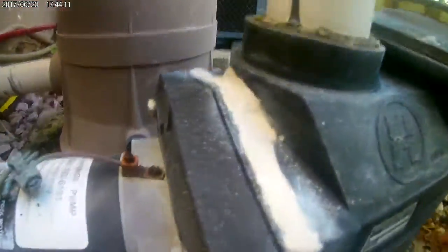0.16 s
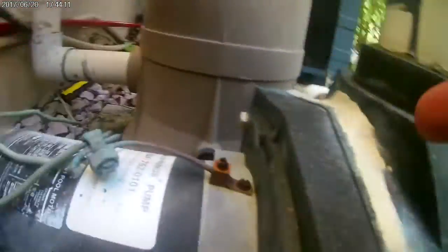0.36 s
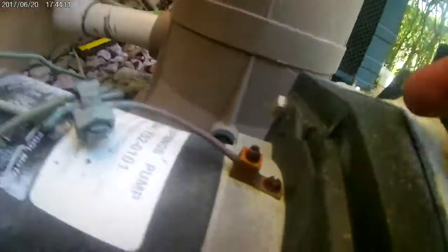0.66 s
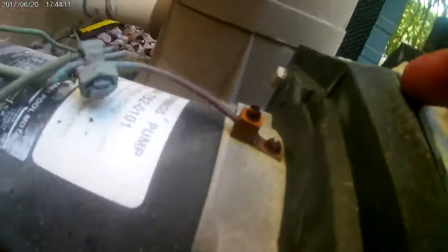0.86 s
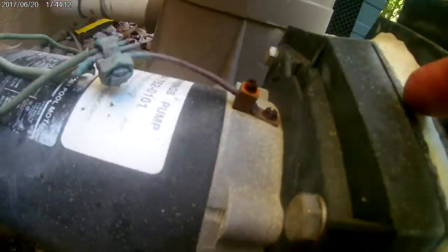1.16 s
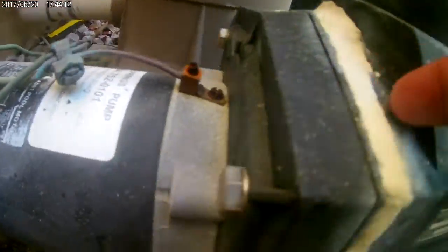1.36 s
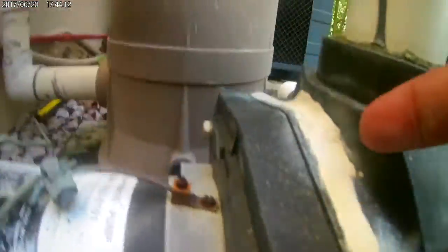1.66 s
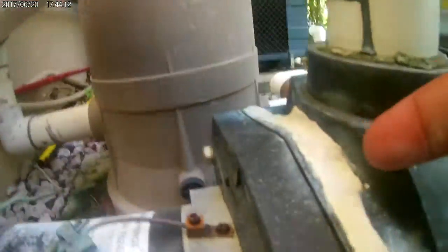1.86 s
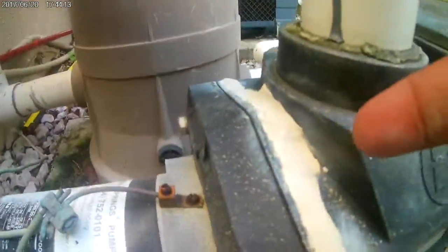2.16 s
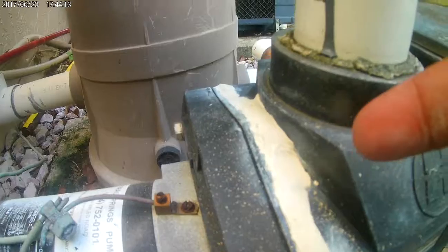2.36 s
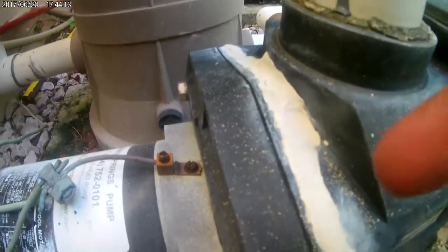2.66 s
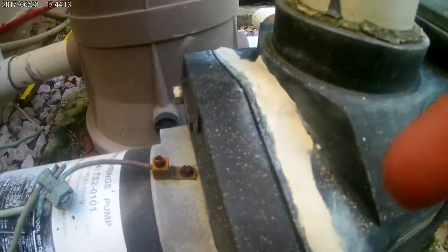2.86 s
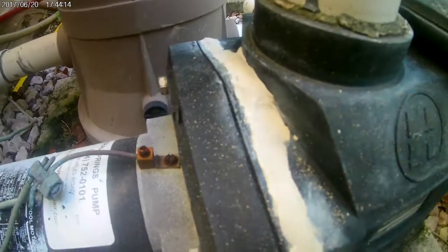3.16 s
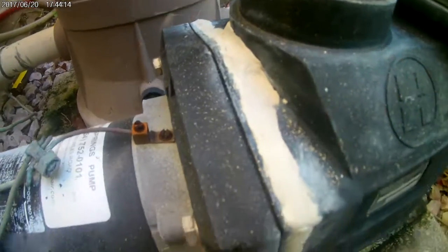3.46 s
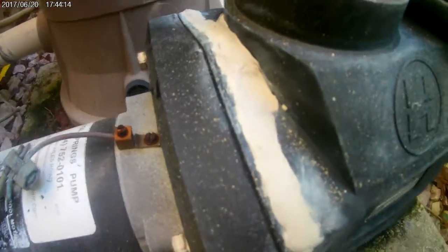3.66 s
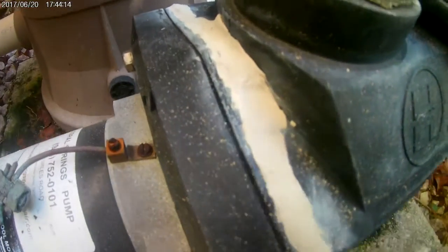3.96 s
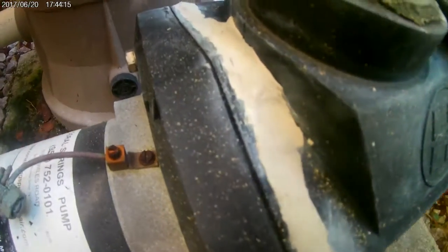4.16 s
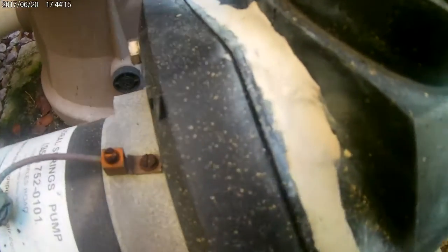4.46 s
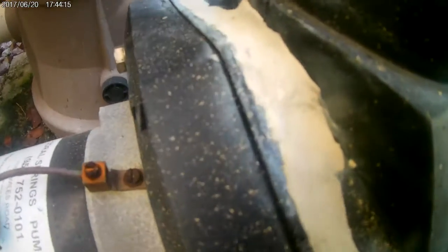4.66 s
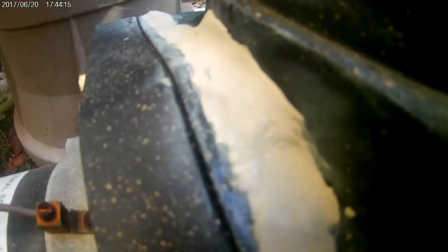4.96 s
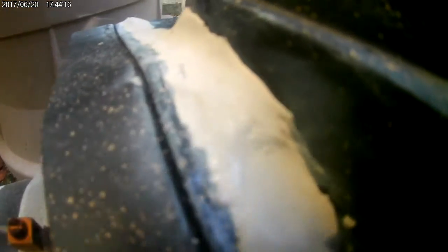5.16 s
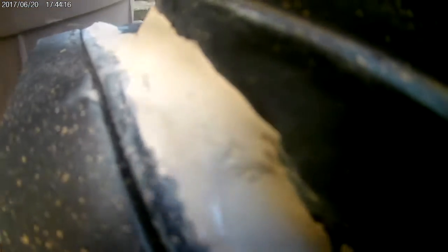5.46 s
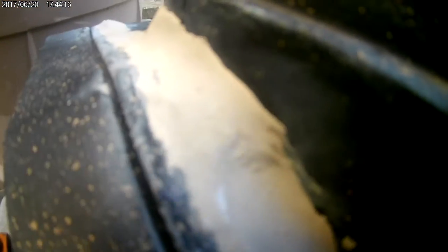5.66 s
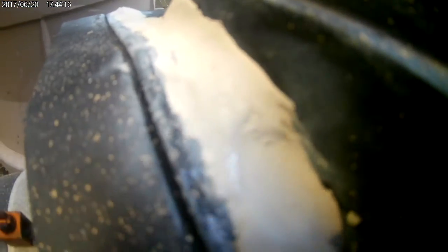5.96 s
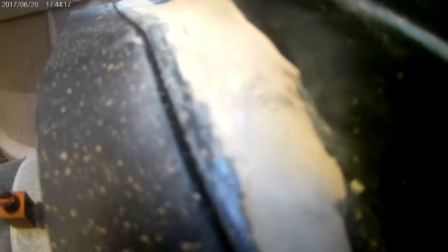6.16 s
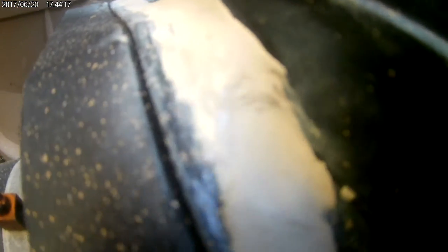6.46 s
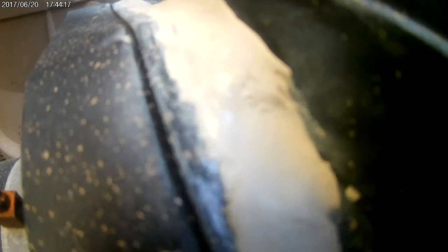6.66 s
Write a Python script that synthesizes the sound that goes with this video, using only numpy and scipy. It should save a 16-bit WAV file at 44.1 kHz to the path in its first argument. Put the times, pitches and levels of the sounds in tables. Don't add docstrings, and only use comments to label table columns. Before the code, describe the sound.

Heard very close through a small, rough hand-held microphone: steady pump whir, rushing water and fan air, faint high motor whine. Handling sits on top: sharp knocks at the start, soft finger bumps, skin rubbing, low rumble, and a lighter click midway. Low electrical hum comes and goes, becoming a strong buzzing drone near the end over faint hiss.

```python
import sys
import numpy as np
from scipy import signal
from scipy.fft import rfft, irfft
from scipy.io import wavfile
from scipy.ndimage import uniform_filter1d

SR = 44100
rng = np.random.default_rng(int(sys.argv[2]) if len(sys.argv) > 2 else 0)


def output_pcm(signal):
    pcm = np.clip(np.atleast_2d(signal).T, -1, 1) * 32767
    wavfile.write(sys.argv[1], SR, np.round(pcm).astype(np.int16))


def level_to_linear(level):
    exponent = np.asarray(level, float) / 20
    return 10 ** exponent


N = 299880
T = np.arange(N) / SR

MAINS_HZ = 120
SHAFT_HZ = 57.98


def unit(x):
    return x / np.sqrt(np.mean(x ** 2))


def columns(table):
    s, *rest = np.transpose(table)
    return [np.interp(T, s, c) for c in rest]


def noise():
    return rng.standard_normal(N)


def walk(rate_hz):
    hold = int(SR / rate_hz)
    steps = np.repeat(rng.standard_normal(N // hold + 1), hold)
    return unit(uniform_filter1d(uniform_filter1d(steps, hold), hold)[:N])


def band(x, lo_hz, hi_hz, order=2):
    sos = signal.butter(order, [lo_hz, min(hi_hz, SR / 2.1)], "bandpass", fs=SR, output="sos")
    return signal.sosfilt(sos, x)


def colour(x, slope, bells):
    hz = np.linspace(1, SR / 2, 4097)
    line_hz, line_db = np.transpose(slope)
    db = np.interp(np.log(hz), np.log(line_hz), line_db)
    db = db + sum(peak_db / (1 + (2 * (hz - f) / width) ** 2) for f, width, peak_db in bells)
    cepstrum = irfft(np.log(level_to_linear(db)))
    cepstrum[1:4096] *= 2
    cepstrum[4097:] = 0
    impulse = irfft(np.exp(rfft(cepstrum)))[:4096]
    return signal.fftconvolve(x, impulse)[:N]


def patchy(x, patchy_db, from_hz):
    hz, _, cells = signal.stft(x, SR, nperseg=1536)
    depth_db = patchy_db * hz[:, None] / (hz[:, None] + from_hz)
    gain = level_to_linear(depth_db * rng.standard_normal(cells.shape))
    gain = gain / np.sqrt(np.mean(gain ** 2, axis=1, keepdims=True))
    return signal.istft(cells * gain, SR, nperseg=1536)[1][:N]


def tone(hz, wobble_db, wander_hz):
    turns = np.cumsum(hz + wander_hz * walk(6)) / SR + rng.random()
    return np.sqrt(2) * np.sin(2 * np.pi * turns) * level_to_linear(wobble_db * walk(9))


def steady(x, hold_s):
    return unit(x / (uniform_filter1d(x ** 2, int(hold_s * SR)) + 1e-9) ** 0.48)


def add(out, start_s, x):
    i = int(start_s * SR)
    out[i:i + len(x)] += x[:N - i]


# time_s, nearness_db, facing_db (towards the impeller housing)
PATH = [(0.0, -1, -1.5), (0.6, 0, 0.5), (0.86, 2, 1), (1.0, 1.5, -4), (1.3, .5, 0.5), (1.65, 1, -10),
        (2.0, -.5, -4), (2.4, -.5, -4.5), (3.2, -1, -3), (3.8, -1, 0), (4.2, -.5, -0.5), (4.7, 0.5, 2),
        (5.55, 1.5, 6), (6.2, 1, 6), (6.55, 1.6, 5.5), (6.8, 0.2, 6.5)]
# multiple (of the shaft rate), level_db
SHAFT_TONES = [(10, -60), (20, -75), (25, -72.5), (30, -70), (38, -70)]
# pitch_hz, level_db
SLOT_TONES = [(3571, -70), (3691, -72), (3811, -73), (3930, -68), (4053, -68), (4174, -69), (4238, -73),
              (4294, -70), (4521, -79)]
# pitch_hz, level_db
WHISTLES = [(10503, -90), (13636, -97), (13717, -96)]


def pump():
    near_db, facing_db = columns(PATH)
    rush_db, hiss_db = 0.99 * near_db, 0.59 * near_db
    vanes = level_to_linear(-57 + 2.3 * near_db) * tone(6 * SHAFT_HZ, 2.0, 0.6)
    second_vanes = level_to_linear(-56 + facing_db) * tone(12 * SHAFT_HZ, 1.5, 0.7)
    orders = sum(level_to_linear(db) * tone(k * SHAFT_HZ, 2.5, 1.5) for k, db in SHAFT_TONES)
    orders = orders + level_to_linear(-63) * tone(10 * MAINS_HZ, 2.5, 6.0)
    slots = sum(level_to_linear(db) * tone(hz, 3.0, 3.5) for hz, db in SLOT_TONES + WHISTLES)
    lines = vanes + second_vanes + orders * level_to_linear(rush_db) + slots * level_to_linear(hiss_db)
    return lines + rush(-48 + rush_db, -56 + hiss_db)


# pitch_hz, level_db (per Hz)
RUSH = [(88, -28), (150, -14.5), (296, -2.5), (346, -24), (397, -3.5), (697, 1), (847, -0.5), (1180, -5),
        (1350, -3.5), (2780, -11), (4020, -11), (7940, -27), (15700, -51)]
# pitch_hz, width_hz, level_db
CASE = [(473, 188, 7.5), (1194.5, 114, 14), (1366, 53, -23.5), (1590, 270, 4), (1760, 110, -1),
        (1727, 96, 2.5), (2813, 210, -9), (3350, 330, 10.5), (4080, 220, 6), (4786, 240, 7),
        (5560, 710, -2.5), (6530, 1300, 7), (7950, 560, -40), (9400, 2100, 8.5)]


def rush(rush_db, hiss_db):
    flow = patchy(colour(noise(), RUSH, CASE), 5.1, 3000)
    edges_hz = 150 * 2 ** np.arange(0, 7.1, 0.5)
    throb = 1 + 0.11 * np.sin(2 * np.pi * MAINS_HZ * T)
    shared = walk(15)
    parts = [band(flow, lo, hi) * level_to_linear(0.4 * shared + 0.4 * walk(25))
             for lo, hi in zip(edges_hz, edges_hz[1:])]
    low = sum(parts[:8])
    high = throb * sum(parts[8:])
    low = low / band(low, 400, 2400).std()
    high = high / band(high, 3000, 7000).std()
    return level_to_linear(rush_db) * low + level_to_linear(hiss_db) * high


# start_s, length_s, level_db, rise_db (gain until the end)
PRESSES = [
    (0.0, 0.019, -34.5, -10),
    (0.865, 0.07, -47, 2),
    (1.077, 0.33, -43, 2),
    (3.72, 0.077, -63, 2),
    (4.55, .08, -55.5, -2),
    (5.364, 0.577, -38.5, 5.5),
    (6.045, 0.065, -43.5, -2.5),
    (6.27, 0.07, -49, 0),
]


def hum():
    edge_s, rattle_from_db, rattle_db = 0.03, -40, -41.5
    gain = level_to_linear(-57.5 + 1.9 * walk(12))
    for start_s, length_s, db, rise_db in PRESSES:
        inside_s = np.minimum(T - start_s, start_s + length_s - T)
        held = np.clip(inside_s / edge_s + 0.5, 0, 1)
        gain = gain + held ** 2 * level_to_linear(db + rise_db * np.clip((T - start_s) / length_s, 0, 1))
    hard = (gain / level_to_linear(rattle_from_db)) ** 7.0
    rattle = level_to_linear(rattle_db) * hard / (1 + hard)
    return gain * tone(MAINS_HZ, 0.7, 0.095) + rattle * tone(MAINS_HZ / 2, 1.9, 2.6)


# time_s, level_db
EFFORT = [(0.0, -27), (0.09, -34), (0.26, -25), (0.45, -29.5), (1.66, -29.5), (1.68, -33), (1.97, -29.5),
          (2.14, -38), (2.4, -33), (3.29, -35.5), (3.35, -30), (3.52, -33.5), (3.98, -35), (4.01, -34.5),
          (6.04, -33.5), (6.1, -38.5), (6.27, -39.5), (6.8, -35)]
EFFORT_SHARES = (1.0, 0.83, 0.34)
# peak_s, length_s, extra_db, quickness (0 sways, 1 shakes and kneads)
SHIFTS = [(.11, 0.035, 5, 0.66), (0.169, 0.024, 19, 1.0), (.24, 0.026, 16, 0.78), (.31, 0.068, 7.5, 0.09),
          (.8, 0.061, 2, 0.36), (.86, 0.046, -3, 0.22), (.95, 0.06, 10, .1), (1.0, 0.058, 9, 0.77),
          (1.21, 0.045, 3, 0.45), (1.4, 0.044, 5.5, 0.93), (1.6, 0.047, 12, 0.26), (1.9, 0.048, 9, .9),
          (2.05, 0.16, -6.5, 0.12), (2.45, 0.31, 0.5, .1), (2.65, 0.074, 8.5, .1), (2.97, .05, 2, .2),
          (3.35, 0.14, 11, 0.51), (3.45, 0.096, -5.5, .1), (3.49, 0.015, 2, .8), (3.86, 0.11, 7, 0.083),
          (4.39, 0.046, 2.5, .1), (4.45, 0.044, 6.5, 1), (4.75, 0.15, 17, 0.45), (5.0, 0.054, 0, .1),
          (5.21, 0.11, 11, 0.33), (5.64, .06, 3.5, .8), (5.93, .05, 7, 0.3), (6.3, .06, 13, 0.16),
          (6.42, .04, 15, 0.17)]


def hand():
    effort_db = columns(EFFORT)[0] + 33
    slow_db, quick_db = 0, 0
    for peak_s, length_s, extra_db, quickness in SHIFTS:
        swell_db = extra_db * np.exp(-(2 * (T - peak_s) / length_s) ** 2)
        slow_db = slow_db + swell_db * (1 - 2 * quickness)
        quick_db = quick_db + swell_db * (2 * quickness - 0.6)
    sway_share, shake_share, knead_share = EFFORT_SHARES
    sway_db = -34.5 + sway_share * effort_db + 1.0 * walk(12) + slow_db
    shake_db = -45.5 + shake_share * effort_db + 1.5 * walk(14) + quick_db
    knead_db = -62 + knead_share * effort_db + 3.0 * walk(14) + 0.84 * quick_db
    sway = steady(band(noise(), 10.7, 40.2), 0.12)
    shake = steady(band(noise(), 49, 106.8) * level_to_linear(2.0 * walk(25)), 0.092)
    knead = unit(band(noise(), 118, 333) * level_to_linear(3.8 * walk(37)))
    return level_to_linear(sway_db) * sway + level_to_linear(shake_db) * shake + level_to_linear(knead_db) * knead


# pitch_hz, level_db (per Hz)
RUB_COLOUR = [(200, -6), (600, 0), (1500, 0), (2400, -4), (3000, -9), (4500, -11), (6500, -13), (7500, -24),
              (11000, -27), (16000, -38)]
# pitch_hz, width_hz, level_db
GRIP = [(1200, 300, 3), (1500, 200, 4), (2750, 550, -15), (3750, 650, 9), (4850, 700, -10), (6000, 900, 9),
        (6850, 350, -14), (7500, 500, 6), (8200, 800, -15), (9700, 1500, 7)]
# peak_s, level_db, rise_s, fall_s, brightness_db
STROKES = [(.15, -56, 0.027, 0.027, 10.5), (0.171, -24, .006, 0.0097, -4), (.183, -46.5, 0.011, 0.025, 7.5),
           (0.228, -55, 0.0052, 0.031, 20.5), (0.247, -30.5, 0.023, 0.01, -9),
           (0.259, -44, .008, 0.026, 8.5), (0.28, -49.5, .025, 0.0093, 9.5), (.31, -61, 0.013, .012, 11),
           (.93, -60.5, 0.03, 0.05, 11), (1.584, -44, 0.035, 0.042, 4), (1.72, -48, .03, .08, -3),
           (1.84, -54.5, 0.13, 0.097, 7.5), (1.899, -52.5, 0.037, 0.027, -4),
           (3.355, -45, .005, 0.016, 8.5), (3.362, -39, 0.0088, .018, 6.5), (3.382, -41.5, 0.022, 0.026, 1),
           (3.405, -48, 0.028, 0.022, -1), (3.345, -54, 0.028, .01, 6), (5.7, -84, .06, .09, 8),
           (5.87, -66, 0.093, 0.11, 13)]
# level_db (against the body), share (of
SKIN_PARTS = [(-3.5, 0.87), (-3.5, 0.97), (-9.5, 1.0), (-20, 1.2)]


def rubs():
    grains = noise() * level_to_linear(2.5 * rng.exponential(size=N) + 2.0 * walk(200))
    skin = patchy(colour(grains, RUB_COLOUR, GRIP), 4.9, 2700)
    edges_hz = [200, 1750, 2750, 4900, 7000, 16000]
    parts = np.array([unit(band(skin, lo, hi, order=3)) for lo, hi in zip(edges_hz, edges_hz[1:])])
    out = np.zeros(N)
    for peak_s, db, rise_s, fall_s, bright_db in STROKES:
        span = slice(max(int((peak_s - 4 * rise_s) * SR), 0), int((peak_s + 4 * fall_s) * SR))
        t = T[span] - peak_s
        away = np.where(t < 0, -t / rise_s, t / fall_s)
        mix = level_to_linear(np.array([0] + [part_db + share * bright_db for part_db, share in SKIN_PARTS]))
        out[span] += level_to_linear(db - 20 * away ** 1.56) * (mix @ parts[:, span])
    return out


# start_s, level_db (peak), push_ms, ring_s, push_share
CLICKS = [
    (.169, -1, 0.37, 0.021, 1.2),
    (0.226, -26, 0.23, 0.019, 0.12),
    (0.233, -33, 0.41, 0.0083, 0.082),
    (.245, -8.5, 0.56, 0.023, 0.77),
    (0.2461, -12, 0.25, 0.0089, 0.42),
    (0.256, -30, 0.51, 0.016, 0.12),
    (0.4387, -24, 0.77, 0.013, 0.54),
    (3.3584, -19.5, 1.34, 0.016, 1.1),
    (3.361, -23, 0.2, 0.047, 0.16),
]
# pitch_hz, level_db, share (of the ring time)
SHELL = [(740, 6, 0.33), (1138, 5, 0.77), (1463, -6, 1.8), (1806, -6.5, 1.1), (2200, -30, 0.68),
         (3460, 3, 0.51), (3710, 2.5, 0.5), (5590, -8.5, 0.65), (6170, -9.5, 0.75), (11100, -8.5, 0.25)]


def clicks():
    out, t = np.zeros(N), T[:3000]
    for start_s, db, push_ms, ring_s, push_share in CLICKS:
        treble = 0.75 / (1 + (push_ms / 0.69) ** 9.7)
        push = np.sin(np.pi * np.clip(t / (push_ms * 1e-3), 0, 1)) ** 2
        rings = 0
        for hz, mode_db, share in SHELL:
            luck = rng.standard_normal()
            level = level_to_linear(mode_db + 2 * luck) * (treble if hz > 3000 else 1)
            decay = np.exp(-np.log(1000) * t / (ring_s * share))
            rings = rings + level * np.sin(2 * np.pi * hz * (1 + 0.0074 * luck) * t) * decay
        onset = 1 - np.exp(-t / 0.0004)
        add(out, start_s, level_to_linear(db) * (push_share * push + 0.29 * rings * onset))
    return colour(out, [(20, 2), (6500, 1), (8000, -8), (16000, -9)], [(8250, 1500, -20.5)])


# start_s, level_db (peak), swing_hz (negative starts inwards), swings
BUMPS = [(0.169, -10, -57, 0.34), (.244, -12.5, 63, 0.99), (0.795, -22, 78, 0.96), (.822, -19, -34.5, 1),
         (1.304, -39, 109, 1), (1.323, -25, 126, 0.7), (1.341, -26, 119, 1.4), (1.343, -34, 244, 4.8),
         (1.386, -27.5, 182, 3.8), (1.438, -36, 226, 2.3), (1.894, -22, -150, 0.69), (3.345, -21, 29, 0.33),
         (3.36, -16, 78.5, 0.86), (3.372, -24.5, 47, 2), (5.039, -35, 185, 0.66), (5.192, -39, 173, 1.6),
         (6.258, -34.5, 136, 1.4), (6.289, -36, 40, 1.6)]


def bumps():
    out, t = np.zeros(N), T[:4000]
    for start_s, db, hz, swings in BUMPS:
        envelope = np.sin(np.pi * np.clip(t * abs(hz) / swings, 0, 1)) ** 0.5
        add(out, start_s, level_to_linear(db) * np.sin(2 * np.pi * hz * t) * envelope)
    return out


def microphone_hiss():
    hiss = patchy(band(noise(), 5600, 16000, order=1), 5.0, 2500)
    return level_to_linear(-68) * hiss * level_to_linear(0.5 * walk(9.6))


def scene():
    handling = hand() + rubs() + clicks() + bumps()
    return (pump() + hum() + handling + microphone_hiss())[None, :]


def coarse_treble(x, step_db, scatter_db, from_hz, top_hz):
    hz, s, cells = signal.stft(x, SR, window="cosine", nperseg=2048)
    size = np.abs(cells) + 1e-12
    masking = np.exp(uniform_filter1d(np.log(size), size=64, axis=0))
    luck = rng.standard_normal((len(hz) // 12 + 1, len(s)))
    luck = np.repeat(luck, 12, axis=0)[:len(hz)]
    treble = (hz ** 2 / (hz ** 2 + from_hz ** 2))[:, None]
    step = level_to_linear(step_db + scatter_db * luck) * masking * treble + 1e-12
    kept = np.round(size / step) * step / size * (hz < top_hz)[:, None]
    return signal.istft(cells * kept, SR, window="cosine", nperseg=2048)[1][:N]


def band_limit(x):
    return signal.sosfilt(signal.butter(12, 15830, fs=SR, output="sos"), x)


def record(dry):
    limited = np.clip(dry[0], -0.97, 0.97)
    mix = coarse_treble(limited, step_db=6.5, scatter_db=3.5, from_hz=3300, top_hz=15750)
    return band_limit(mix[None, :])


dry = scene()
out = record(dry)
output_pcm(out)
```